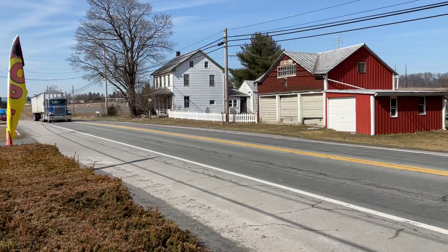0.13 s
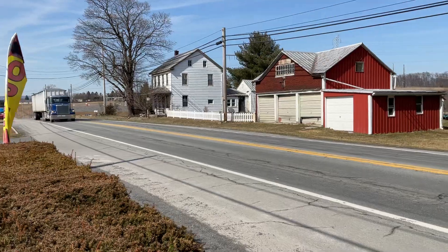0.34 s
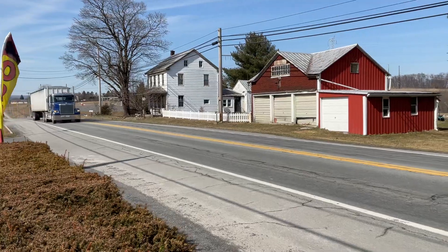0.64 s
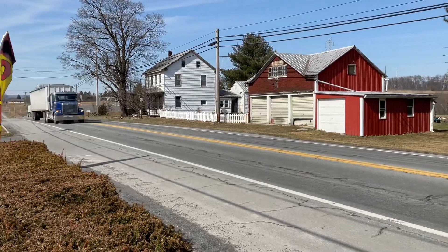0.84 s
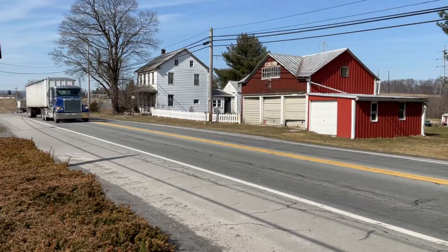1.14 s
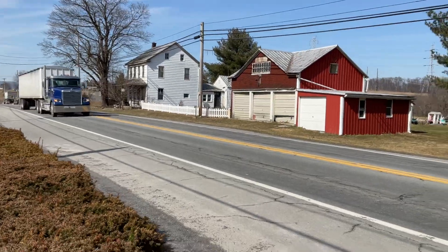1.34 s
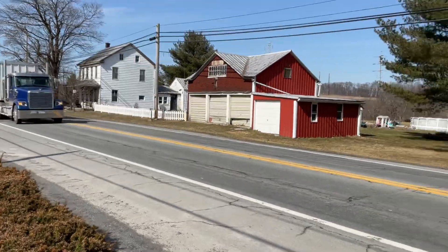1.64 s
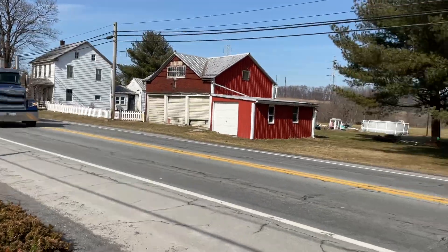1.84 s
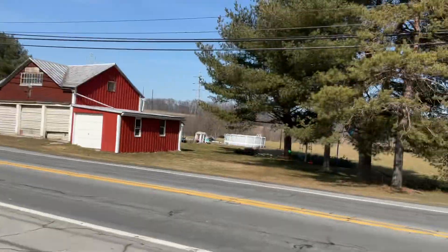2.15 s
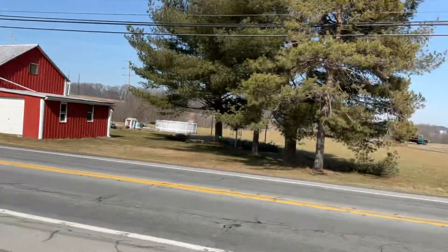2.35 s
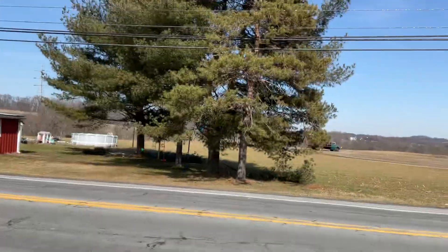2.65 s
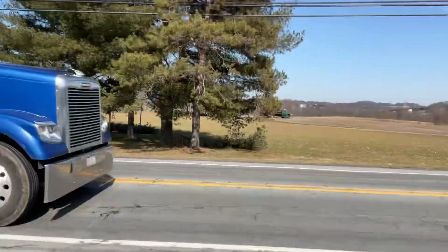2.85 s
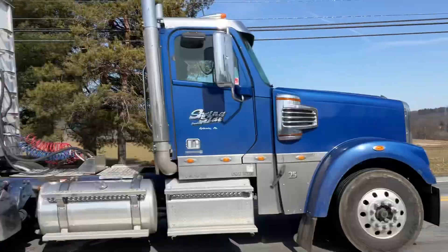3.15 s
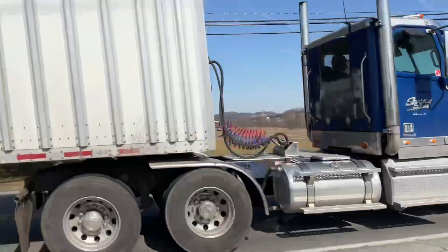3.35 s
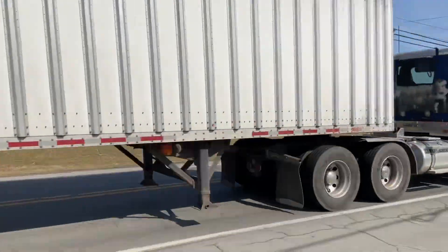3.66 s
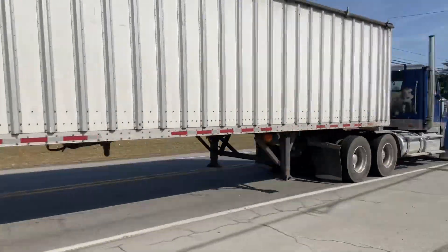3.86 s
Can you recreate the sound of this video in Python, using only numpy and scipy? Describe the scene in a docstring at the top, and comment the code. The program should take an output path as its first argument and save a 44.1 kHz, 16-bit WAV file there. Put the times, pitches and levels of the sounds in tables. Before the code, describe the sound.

A semi truck approaches, toots its air horn once and rumbles close past.

```python
"""A semi truck comes down a country road: its diesel drones, the gears whine, rumble, tyre roar and
hiss swell, and the trailer rattles a little. At 2.4 s it toots its air horn once; trees and a barn
return the sound. At 3.2 s it passes 6 m away with a thin turbo whistle, and the Doppler shift lowers
the engine's pitch. The microphone has two closely spaced ports."""
import sys
import numpy as np
from scipy import signal
from scipy.fft import rfft, irfft
from scipy.io import wavfile
from scipy.ndimage import uniform_filter1d

SR = 44100
rng = np.random.default_rng(int(sys.argv[2]) if len(sys.argv) > 2 else 0)


def transcribe(u):
    """Save the signal u as a 16-bit wav file named by the first command-line argument.

    u: samples, shape (n,) or (channels, n), limited to [-1, 1]; the rate is SR.
    q: integer samples, one column per channel.
    """
    v = np.clip(np.atleast_2d(u).T, -1, 1)
    q = np.round(v * 32767).astype(np.int16)
    wavfile.write(sys.argv[1], SR, q)


N = 176400
T, FFT_HZ = np.arange(N) / SR, np.fft.rfftfreq(N, 1 / SR)
FRAME_S, BIN_HZ = np.arange(N // 512 + 5) * 512 / SR, np.fft.rfftfreq(2048, 1 / SR)
SPEED_M_S, NEAREST_M, PASS_S = 19, 6, 3.2
CUTOFF_HZ = 15900


def amp(db):
    """Decibels to gain."""
    return 10 ** (np.asarray(db) / 20)


def unit(x):
    """Scale to rms 1."""
    return x / np.sqrt(np.mean(x ** 2) + 1e-20)


def at_hz(points, hz):
    """Interpolate a table over log frequency."""
    f, value = np.transpose(points)
    return np.interp(np.log(hz + 1), np.log(f), value)


def level(rows, column=1):
    """Gain over time from one dB column."""
    rows = np.array(rows)
    return amp(np.interp(T, rows[:, 0], rows[:, column]))


def wander(rate_hz):
    """Smooth random drift, rms 1."""
    lowpass = np.exp(-(FFT_HZ / rate_hz) ** 2) * (FFT_HZ > 0)
    return unit(irfft(rfft(rng.standard_normal(N)) * lowpass, N))


def band(points, skirt_db_per_octave=30):
    """Spectrum in dB per bin, with steep skirts outside the table."""
    octave = np.log2(BIN_HZ + 1)
    outside = abs(octave - np.clip(octave, np.log2(points[0][0]), np.log2(points[-1][0])))
    return at_hz(points, BIN_HZ) - skirt_db_per_octave * outside


# Likeness of the two ports. Each row: frequency in Hz, coherence from 0 to 1.
PORT_COHERENCE = [(170, 0.97), (330, 1), (550, 0.92), (790, 0.67), (1000, 0.8), (1500, 0.44), (2300, 0.63),
                  (2900, 1), (4000, 0.84), (7000, 1), (9000, 1)]

def noise(shape_db, patchy_db=1):
    """Patchy shaped noise, rms 1, partly coherent between the ports."""
    a, b, c, d, patches = rng.standard_normal((5, len(FRAME_S), len(BIN_HZ)))
    patches = uniform_filter1d(patches, size=5, axis=0)
    patches = unit(uniform_filter1d(patches, size=14, axis=1))
    coherence = np.clip(at_hz(PORT_COHERENCE, BIN_HZ), 0, 1)
    left = a + 1j * b
    right = coherence * left + np.sqrt(1 - coherence ** 2) * (c + 1j * d)
    frames = np.array([left, right]) * amp(shape_db + patchy_db * patches)
    return unit(signal.istft(frames.swapaxes(1, 2), nperseg=2048, noverlap=1536)[1][:, :N])


def distance_m(t):
    """Range from cab to microphone."""
    return np.hypot(NEAREST_M, SPEED_M_S * (t - PASS_S))


def crank_turns(start_hz=22.524, sag_hz_per_s=.08, wobble=.0028):
    """Crankshaft turns as heard, with Doppler shift."""
    doppler = 1 / (1 + np.gradient(distance_m(T), T) / 343)
    crank_hz = (start_hz - sag_hz_per_s * T) * (1 + wobble * wander(rate_hz=5.76))
    return np.cumsum(crank_hz * doppler) / SR


# Engine envelope. Each row: time in seconds, level in dB.
ENGINE_LEVEL = [(0, -32.5), (.8, -29.5), (1.45, -24.5), (2.15, -23), (2.7, -24), (3.2, -21), (3.6, -23.5),
                (4, -26.5)]
# Engine orders. Each row: crank multiple as text, gain from ahead in dB, gain from beside in dB.
ENGINE_ORDERS = [("2.5", -14.5, -18), ("3", -11, -9), ("3.5", -13, -13), ("4", -5, -11.5),
                 ("4.5", -11, -10.5), ("5", -15, -12), ("5.5", -23.5, -16), ("6", -0.94, -1.5),
                 ("7", -18, -9.5), ("7.5", -14, -19.5), ("8", -10, -7), ("9", -25.5, -17),
                 ("12", -21.5, -3.5), ("23", -28.5, -10), ("34.5", -22, -5.5)]
# Swells and dips as the truck turns side-on. Each row: order, centre in s, half-width in s, gain in dB.
ORDER_SWELLS = [("2.5", 2.75, .15, 10), ("3", 3.17, 0.23, -21), ("3", 3.95, .15, 7.4), ("4", 2.6, .15, 9.2),
                ("4.5", 4.9, 0.11, 11), ("5", 3.05, 0.11, 16.5), ("6", 2.84, .08, -14),
                ("6", 3.25, 0.23, 10), ("6", 3.8, 0.081, -9), ("8", 2.4, .1, -3), ("8", 3.4, 0.1, 11),
                ("12", 3.24, .11, 11)]

def engine(turns, flutter_db=2):
    """Diesel orders; their balance changes as the cab comes alongside."""
    beside, drone = np.interp(T, [2.65, 3.25], [0, 1]), np.zeros(N)
    for order, ahead_db, side_db in ENGINE_ORDERS:
        swell_db = sum(db * np.exp(-((T - centre_s) / width_s) ** 2)
                       for which, centre_s, width_s, db in ORDER_SWELLS if which == order)
        order_db = ahead_db + (side_db - ahead_db) * beside + swell_db
        gain = amp(order_db + flutter_db * wander(rate_hz=6.1))
        drone += gain * np.sin(2 * np.pi * (float(order) * turns + rng.random()))
    return np.sqrt(2) * drone * level(ENGINE_LEVEL)


# Road noise envelopes, approach then pass. Each row: time in seconds, rumble, roar and hiss in dB.
ROAD_APPROACH = [(0.05, -42.5, -43, -54.5), (0.5, -40.5, -40.5, -54.5), (0.54, -38.5, -42.5, -55),
                 (0.76, -41, -38.5, -51), (1.18, -32.5, -36, -47.5), (1.75, -37, -32.5, -44),
                 (2.38, -32, -27, -42)]
ROAD_PASSING = [(2.66, -28.5, -24, -39), (2.972, -23, -21, -36.5), (3.166, -22.5, -20.5, -36),
                (3.398, -20, -23, -38), (3.492, -32, -21.5, -37), (3.95, -22, -24.5, -38),
                (4.0, -28, -29, -40.5)]
ROAD_LEVELS = list(ROAD_APPROACH) + list(ROAD_PASSING)
# Deep bass envelope. Each row: time in seconds, level in dB.
BOOM_LEVEL = [(0.05, -39), (1.88, -29), (1.93, -30.5), (2.61, -21.5), (3.02, -18), (3.06, -18), (3.29, -23),
              (3.33, -21), (4.0, -24.5)]
# Boom and rumble spectra. Each row: frequency in Hz, relative density in dB.
BOOM_SPECTRUM = [(25, -29.5), (40, -30.5), (58, 10), (85, 5.5), (115, 8.5), (165, 2), (230, 2.5),
                 (400, -27)]
RUMBLE_SPECTRUM = [(100, -52), (170, -3), (230, -0.5), (330, -1), (420, -7), (600, -8), (1200, -49)]

def road_rumble(boom_trim_db=-2.5, rumble_trim_db=1.5):
    """Deep boom and low rumble, swelling as the truck nears."""
    boom = level(BOOM_LEVEL) * noise(band(BOOM_SPECTRUM), patchy_db=-1.4)
    rumble = level(ROAD_LEVELS) * noise(band(RUMBLE_SPECTRUM))
    return amp(boom_trim_db) * boom + amp(rumble_trim_db) * rumble


# Roar spectra, from ahead and from beside. Each row: frequency in Hz, relative density in dB.
ROAR_FRONT = [(200, -26), (380, -5.5), (480, -4), (560, -3), (650, -5.5), (800, -0.5), (980, -1.5),
              (1170, -3.5), (1270, -8.5), (1480, -6), (1630, -2), (1710, -9.5), (1800, -12), (1880, -6.5),
              (1960, -10), (2150, -12.5), (2600, -18.5), (3500, -43), (6000, -54)]
ROAR_SIDE = [(200, -5), (380, -10), (470, 3), (620, -9), (790, 2), (1000, -2), (1250, -7.5), (1600, -8),
             (2000, -13.5), (2600, -19), (3500, -33.5), (6000, -75)]

def tyre_roar(turns, trim_db=4.5, pulse_depth=.067):
    """Midrange roar, pulsed by three firings per crank turn."""
    beside = np.interp(FRAME_S, [1.6, 3], [0, 1])[:, None]
    roar = noise((1 - beside) * band(ROAR_FRONT) + beside * band(ROAR_SIDE), patchy_db=1.5)
    firing = 1 + pulse_depth * np.cos(2 * np.pi * 3 * turns)
    return amp(trim_db) * level(ROAD_LEVELS, column=2) * roar * firing


# Hiss of tyres and horn air. Each row: frequency in Hz, relative density in dB.
HISS_SPECTRUM = [(1500, -35.5), (3000, 3.5), (3800, -1), (4800, -2), (6200, 0), (7500, -5), (9000, -4),
                 (11000, -12.5), (15800, -15.5)]
# Treble lost with distance. Each row: frequency in Hz, loss in dB per metre.
TREBLE_LOSS = [(4800, 0), (6200, 0.22), (8000, 0.31), (10000, 0.46), (12000, 0.54), (15000, 0.5)]
# Hiss change with the wheels alongside. Each row: frequency in Hz, gain in dB.
HISS_ALONGSIDE = [(2800, 0.5), (3700, 1.5), (4650, 3.5), (5400, 0), (6500, -1), (8800, -7), (12000, -1.5),
                  (15000, -5)]

def tyre_hiss(trim_db=2):
    """Flickering hiss that brightens as the air path shortens."""
    path_m = distance_m(np.minimum(FRAME_S, PASS_S))  # the long trailer stays close
    loss_db = path_m[:, None] * at_hz(TREBLE_LOSS, BIN_HZ)
    wheels_db = np.interp(FRAME_S, [2.6, 3.4], [0, 1])[:, None] * at_hz(HISS_ALONGSIDE, BIN_HZ)
    hiss = noise(band(HISS_SPECTRUM) - loss_db + wheels_db, patchy_db=1.77)
    flicker = 1 + .073 * wander(rate_hz=100)
    return amp(trim_db) * level(ROAD_LEVELS, column=3) * hiss * flicker


def gear_whine(turns, order=20.55, trim_db=-1):
    """Gear tone locked to the crank; rides the roar envelope and stands out on the approach."""
    ahead = np.interp(T, [.6, 1.5, 2.3, 3.1], [.4, 1, .7, .25])
    gain = amp(trim_db + 1.3 * wander(rate_hz=16)) * ahead * level(ROAD_LEVELS, column=2)
    return gain * np.sin(2 * np.pi * order * turns)


# Rattles and squeaks. Each row: start in seconds, centre in Hz, width in Hz, level in dB, length in s.
TRAILER_RATTLES = [(0.327, 6200, 700, -58, 0.05566), (0.838, 7360, 2507, -58.5, 0.01421),
                   (0.891, 7956, 2208, -62.5, 0.01938), (1.14, 8180, 80, -57.5, 0.046),
                   (2.665, 9917, 2990, -46, 0.041), (3.034, 11680, 300, -42.5, 0.01011),
                   (3.728, 8856, 3000, -42, 0.0085)]

def trailer_rattles():
    """Loose metal: short bands of noise that swell and die."""
    out = np.zeros(N)
    for start_s, hz, width_hz, db, length_s in TRAILER_RATTLES:
        age = np.maximum(T - start_s, 0) / length_s
        resonance = np.exp(-.5 * ((FFT_HZ - hz) / width_hz) ** 2)
        burst = unit(irfft(rfft(rng.standard_normal(N)) * resonance, N))
        out += amp(db) * burst * 2 * age * np.exp(-age ** 2)
    return out


HORN_HZ, HORN_FALL_HZ_PER_S, HORN_GAIN_DB = 296.8, 11.7, -15.5
HORN_START_S, HORN_ATTACK_S, HORN_HOLD_S, HORN_RELEASE_S, HORN_RING_S = 2.4, .019, .11, .057, .11
# Horn harmonics. Each row: frequency in Hz, relative level in dB.
HORN_SPECTRUM = [(296, 0), (592, -3), (888, -16), (1185, -5.5), (1480, -16), (1775, -10.5), (2070, -13.5),
                 (2370, -20.5), (2670, -18), (2960, -19.5), (3250, -32.5), (3550, -27), (3850, -29),
                 (4140, -26), (4430, -19.5), (4730, -22), (5030, -26), (5320, -20), (5620, -29),
                 (5910, -19.5), (6200, -13), (6510, -32), (6800, -22.5), (7400, -47), (8000, -36),
                 (8900, -24), (9200, -29), (9500, -32), (10200, -56), (13000, -58), (15000, -49)]
# Shift in their balance. Each row: frequency in Hz, change over the hold in dB.
HORN_DRIFT = [(1200, -0.5), (1780, -6), (2070, 2), (2670, 0.5), (3550, -18), (4140, 5), (4430, 5.5),
              (4730, -12), (5030, 4), (5320, 0), (5910, 3), (6200, -9), (8000, -4), (8900, -10), (9500, -2)]

def air_horn(pitch_hz, jitter=.0017, flutter_db=2.5, rasp_rad=.02, blare_hz=2200, mellow_hz=3000):
    """Air drives a diaphragm; high harmonics need full pressure, so they come late and leave early."""
    t = T - HORN_START_S
    rise = np.sin(np.pi / 2 * np.clip(t / HORN_ATTACK_S, 0, 1))
    opened = 1 - np.exp(-(np.maximum(t, 0) / HORN_ATTACK_S) ** 2)
    shut_s = np.maximum(t - HORN_HOLD_S, 0)
    release = np.exp(-(shut_s / HORN_RELEASE_S) ** 2)
    ring = np.exp(-shut_s / HORN_RING_S)  # the fundamental lingers after the valve shuts
    hz = (pitch_hz - HORN_FALL_HZ_PER_S * t) * (1 + jitter * wander(rate_hz=106.3))
    on = np.flatnonzero((t > 0) & (t < .5))
    cycles, tone = np.cumsum(hz[on]) / SR, np.zeros(N)
    flutter, rasp = wander(rate_hz=40), wander(rate_hz=110)
    drift = np.minimum(t[on] / HORN_HOLD_S, 1) - .5
    for k in np.arange(1, CUTOFF_HZ // HORN_HZ):
        harmonic_hz = k * HORN_HZ
        own = (on + rng.integers(N)) % N  # each harmonic wavers separately
        db = at_hz(HORN_SPECTRUM, harmonic_hz) + at_hz(HORN_DRIFT, harmonic_hz) * drift
        db += flutter_db * min(k / 14, 1) * flutter[own]
        phase = 2 * np.pi * (k * cycles + rng.random()) + rasp_rad * min(k, 14) * rasp[own]
        attack = opened[on] ** (harmonic_hz / blare_hz)
        fade = ring[on] if k == 1 else release[on] ** (1 + harmonic_hz / mellow_hz)
        tone[on] += amp(db) * attack * fade * np.sin(phase)
    air = amp(-17.5) * opened ** 2 * release * noise(band(HISS_SPECTRUM))
    return amp(HORN_GAIN_DB) * rise * (np.sqrt(2) * tone + air)


# Outdoor decay. Each row: frequency in Hz, T60 in seconds.
ECHO_T60 = [(300, .7), (1200, 0.41), (5000, 0.52), (12000, 0.15)]

def horn_echo(pitch_hz=301, gain_db=-10.5, band_hz=(553, 5000), taps_per_s=1500, build_s=.023):
    """Trees and walls ahead of the truck receive a higher pitch and scatter it back, dulled."""
    foliage = signal.butter(1, band_hz, "bandpass", fs=SR)  # leaves scatter little bass
    thrown = signal.lfilter(*foliage, air_horn(pitch_hz))
    taps = rng.standard_normal((2, SR)) * (rng.random(SR) < taps_per_s / SR)
    taps[1] = taps[0] + .44 * taps[1]  # nearly alike at both ports
    hz, t, frames = signal.stft(taps, SR, nperseg=256)
    decay = amp(-60 * t / at_hz(ECHO_T60, hz)[:, None])
    build = np.clip(t / build_s, 0, 1) ** 2
    tail = signal.istft(frames * decay * build, SR, nperseg=256)[1]
    tail /= np.linalg.norm(tail[0])
    return amp(gain_db) * signal.fftconvolve(thrown, tail, axes=1)[:, :N]


def turbo(turns, order=205, blur=.005, level_db=-46, centre_s=3.12, width_s=.3):
    """Thin, blurred turbocharger whistle that falls in pitch as the cab goes by."""
    cycles = np.cumsum(order * np.gradient(turns) * (1 + blur * wander(rate_hz=150)))
    near = np.exp(-((T - centre_s) / width_s) ** 2 / 2)
    return amp(level_db + 3.5 * wander(rate_hz=10)) * near * np.sin(2 * np.pi * cycles)


def scene():
    """The passing truck, its horn and the echo."""
    turns = crank_turns()
    truck = engine(turns) + road_rumble() + tyre_roar(turns) + tyre_hiss() + gear_whine(turns)
    return truck + trailer_rattles() + air_horn(HORN_HZ) + horn_echo() + turbo(turns)


# Left port against right. Each row: frequency in Hz, level difference in dB.
LEFT_GAIN = [(40, 0.3477), (150, -2), (270, -4), (420, -0.5), (630, -1), (850, 13.5), (1100, 2.5),
             (1280, 6), (1550, -1.5), (2000, -4.5), (2800, -2), (4600, -2), (5800, -4.5), (8000, -1)]
# Left port against right. Each row: frequency in Hz, phase difference in radians.
LEFT_PHASE = [(40, -0.08), (200, 0.26), (400, 0.95), (550, 1.5), (780, 3), (1000, 1.6), (1250, 0.6),
              (1900, 0.28), (2350, -1.83), (2950, -2.5), (3600, -5.5), (4400, -6), (8000, -6)]

def record(dry, alike_above_hz=7500, start_s=.034, ceiling=.95):
    """Two ports, unlike except in the top treble; then a 3 ms fade-in, soft clip and low-pass."""
    hz = np.fft.rfftfreq(2 * N, 1 / SR)
    apart = 1 / (1 + (hz / alike_above_hz) ** 20)
    left = 1 - apart + apart * amp(at_hz(LEFT_GAIN, hz)) * np.exp(1j * at_hz(LEFT_PHASE, hz))
    ports = np.array([left, np.ones(len(hz))]) * np.sqrt(2 / (1 + abs(left) ** 2))  # constant power
    heard = irfft(rfft(dry, 2 * N) * ports)[:, :N]
    heard *= np.clip((T - start_s) / .003, 0, 1)
    heard /= (1 + (heard / ceiling) ** 8) ** (1 / 8)
    lowpass = signal.firwin(511, CUTOFF_HZ, window=("kaiser", 9), fs=SR)
    return signal.oaconvolve(heard, lowpass[None], "same")


dry = scene()
out = record(dry)
transcribe(out)
```